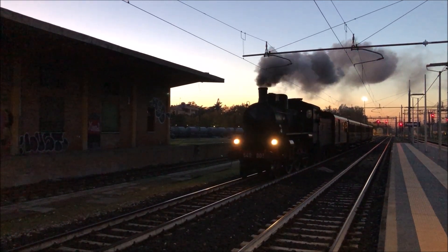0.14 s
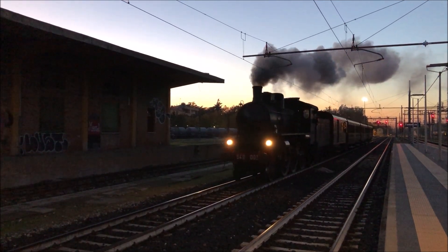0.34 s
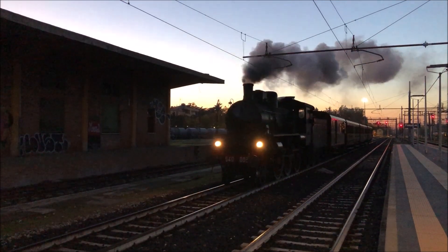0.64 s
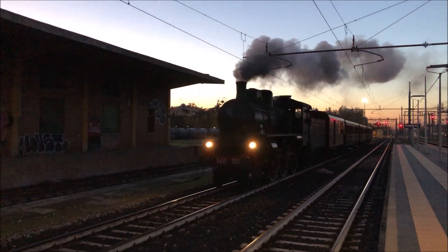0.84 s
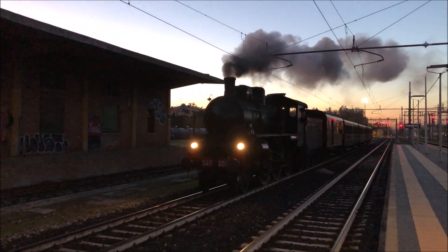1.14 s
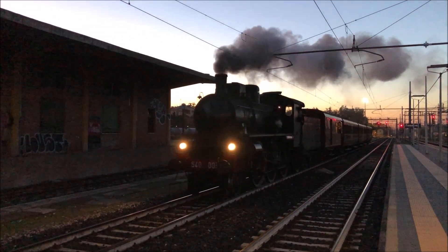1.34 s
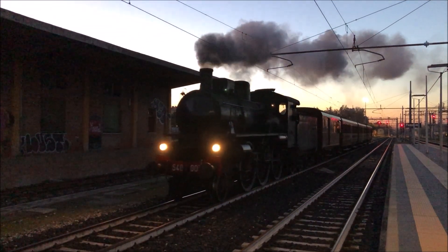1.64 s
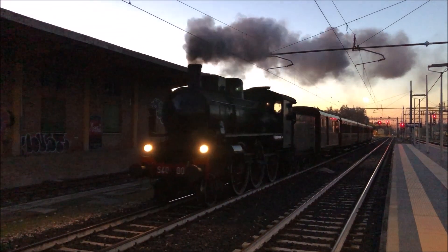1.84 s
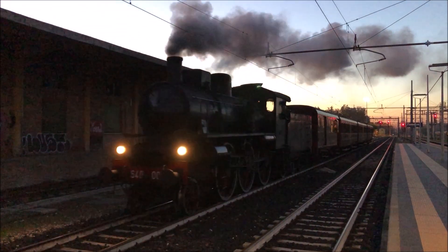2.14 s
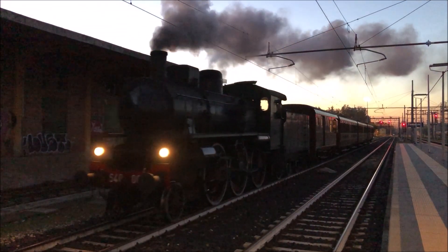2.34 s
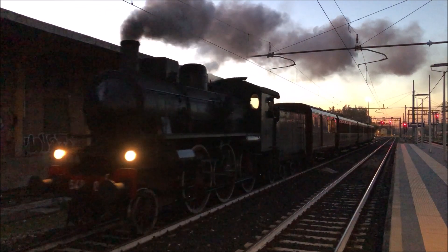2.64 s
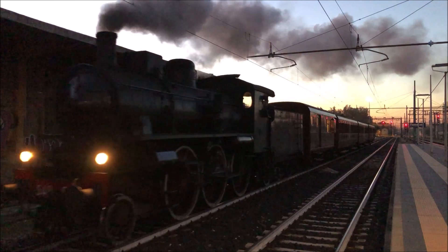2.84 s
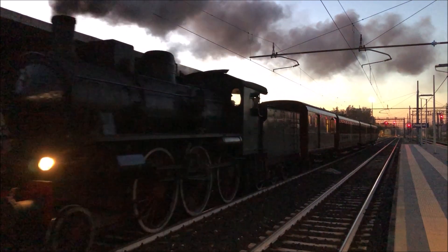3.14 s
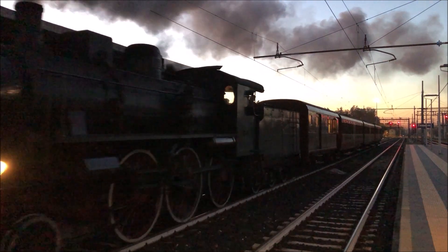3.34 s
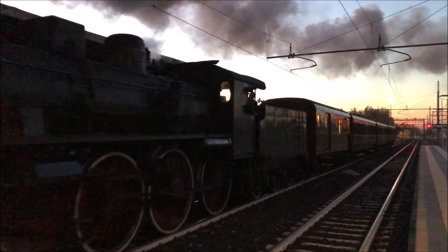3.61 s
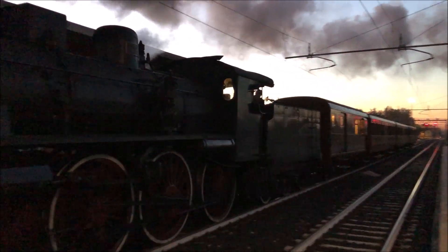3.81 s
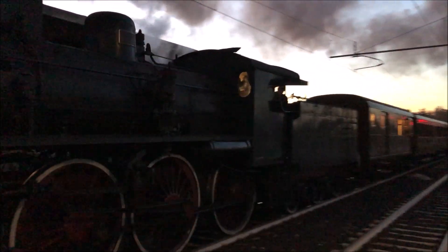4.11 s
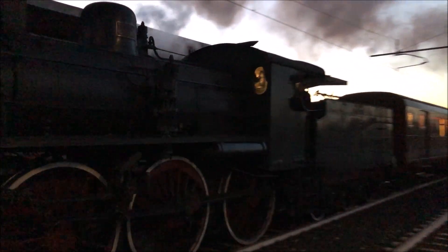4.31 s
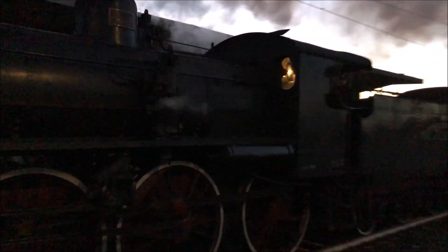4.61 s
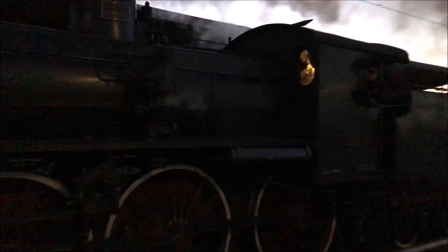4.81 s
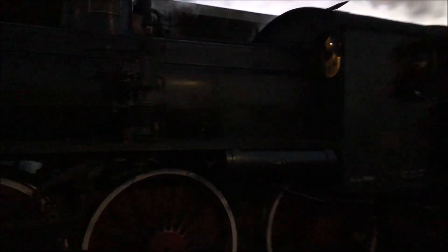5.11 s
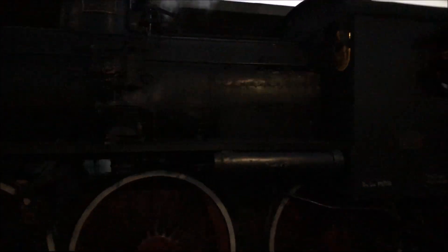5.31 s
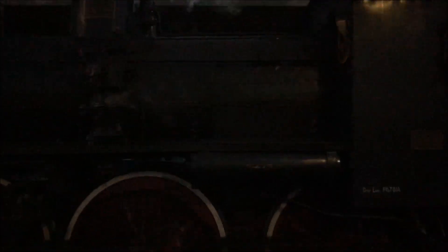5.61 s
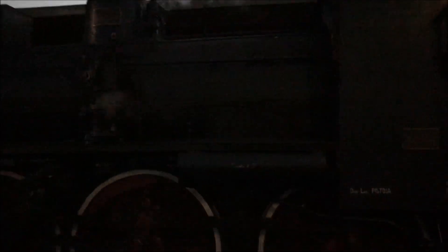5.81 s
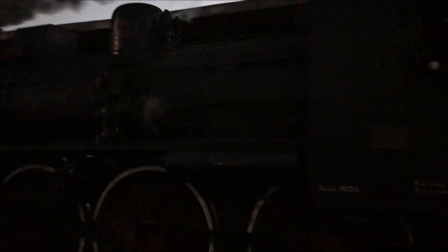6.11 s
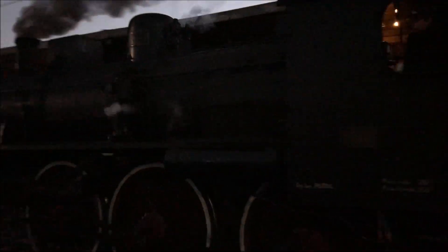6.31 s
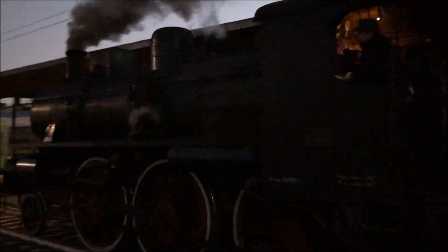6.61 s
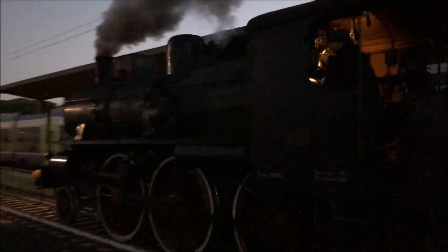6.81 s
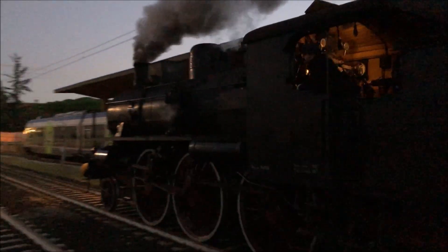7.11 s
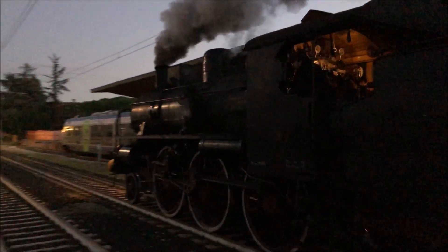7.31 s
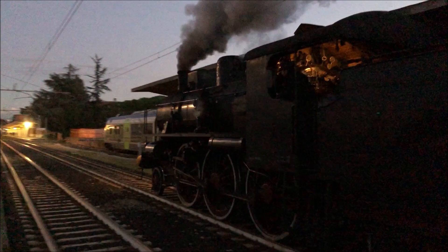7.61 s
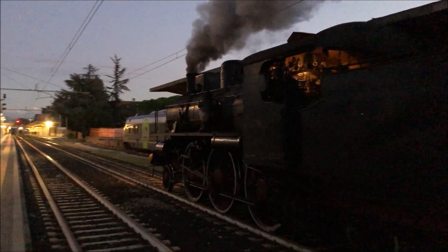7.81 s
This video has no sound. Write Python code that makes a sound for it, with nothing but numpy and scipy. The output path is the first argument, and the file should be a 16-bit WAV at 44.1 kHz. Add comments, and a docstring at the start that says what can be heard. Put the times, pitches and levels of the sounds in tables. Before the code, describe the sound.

A distant-to-close steam train heard from one fixed platform microphone, the same in both channels. Quiet rumble, leaking steam and metallic clinks come first, then a shrill, fluttering whistle: a long blast, a brief gap, a short one, with ringing station echoes. Afterwards rumble and hiss swell as the engine rolls by, puffing regularly, squeaking and finally thudding dully.

```python
"""Steam locomotive whistling into a station

A steam locomotive rolls in and draws close, blowing a long and a short blast on its whistle.
The whistle is a pipe tone with fluttering overtones and jet noise, beating against moving echoes.
Wheels rumble and roar as shaped noise; steam leaks as bright hiss and puffs, mostly a second apart.
Rods clink as decaying partials over scraping noise, running gear knocks dully, and steel sings thinly.
All sources reach one microphone on the platform; the sound above the bass dips for instants."""
import sys
import numpy as np
from scipy import signal
from scipy.fft import rfft, irfft, next_fast_len
from scipy.io import wavfile
from scipy.ndimage import uniform_filter1d, minimum_filter1d, map_coordinates

SR = 44100
rng = np.random.default_rng(int(sys.argv[2]) if len(sys.argv) > 2 else 0)


def log_audio(samples):
    """Write samples as a 16-bit WAV file to the path given in sys.argv[1]."""
    # one column per channel
    frames = np.atleast_2d(samples).T
    # limit to full scale, then quantise
    limited = np.clip(frames, -1, 1)
    pcm = np.round(limited * 32767).astype(np.int16)
    wavfile.write(sys.argv[1], SR, pcm)


N = 350595
T = np.arange(N) / SR  # time of each sample in seconds


def amp(db):
    """Decibels to gain."""
    return 10 ** (np.asarray(db) / 20)


def unit(x):
    """Scale to rms 1."""
    return x / np.sqrt(np.mean(x ** 2) + 1e-20)


def along(points, hz):
    """Interpolate (Hz, value) points on a log frequency axis."""
    f, v = np.transpose(points)
    return np.interp(np.log(hz + 1), np.log(f), v)


def curves(rows):
    """One value per sample for each column after the time."""
    s, *cols = np.transpose(rows)
    return [np.interp(T, s, c) for c in cols]


def wobble(rate):
    """A smooth random curve, rate knots a second."""
    knots = rng.standard_normal(int(N * rate / SR) + 4)
    return map_coordinates(knots, [T * rate])


def filtered(x, response):
    """Multiply the spectrum of x by a response of frequency."""
    m = next_fast_len(N + SR // 2)
    return irfft(rfft(x, m) * response(np.fft.rfftfreq(m, 1 / SR)), m)[:N]


def rush(spectrum, patchy_db):
    """Turbulent noise of rms 1, with patches of random gain in time and frequency."""
    z = signal.stft(rng.standard_normal(N), nperseg=512)[2]
    field = uniform_filter1d(rng.standard_normal(z.shape), size=5, axis=0)
    field = uniform_filter1d(field, size=12, axis=1)
    noise = signal.istft(z * amp(patchy_db * unit(field)), nperseg=512)[1][:N]
    return unit(filtered(noise, lambda hz: amp(along(spectrum, hz))))


def narrow(centre_hz, width_hz):
    """Noise of rms 1 in one resonance, down to half amplitude one width either side of its centre."""
    noise = rng.standard_normal(N)
    return unit(filtered(noise, lambda hz: 1 / (1 + ((hz - centre_hz) / width_hz) ** 2)))


# Rumble of the train, low around the whistle.
# Each row: time in seconds, ground level in dB, frame level in dB, both before a small trim.
RUMBLE_LEVELS = [(0, -32.5, -41), (.85, -34, -42), (1.05, -31.5, -36.7), (2.1, -30, -38.5),
                 (2.78, -29.5, -34.5), (3.0, -37, -40.5), (3.25, -34.5, -40), (3.85, -41, -46),
                 (4.5, -40, -39), (4.8, -35, -36), (5.35, -34.5, -34), (5.6, -34, -28.5), (6.5, -23, -26),
                 (6.85, -30, -26), (7.3, -27, -24.5), (7.94, -24.5, -24.5)]
# Wheels on the rails. Each row: time in seconds, relative level in dB.
# The faint singing of the steel follows it too.
ROLL_LEVELS = [(0, -39), (.35, -36.5), (2.6, -32.5), (3.25, -30), (3.85, -42.5), (4.35, -40), (5.3, -32.5),
               (6.4, -27), (6.75, -29), (7.94, -31.5)]
# Colours of the shaken ground, the frame and the roaring rails.
# Each row: frequency in Hz, relative density in dB per Hz.
GROUND_SPECTRUM = [(20, -40), (35, -26), (55, -5), (90, 1), (125, -4.5), (180, -14.5), (400, -58)]
FRAME_SPECTRUM = [(70, -21), (130, 2), (170, 0), (290, -1.5), (420, -11.5), (600, -13), (1000, -35.5)]
RAIL_SPECTRUM = [(250, -13), (350, -9.5), (450, -5.5), (550, -1), (800, 1.5), (1150, -4.5), (1420, -0.5),
                 (1650, -6.5), (1850, -4), (2300, -11), (3000, -10.5), (4000, -15.5), (7000, -26.5)]


def wheels():
    """The rolling train shakes the ground and its own frame, and makes the rails roar."""
    ground_db, frame_db = curves(RUMBLE_LEVELS)
    roll_db, = curves(ROLL_LEVELS)
    ground = amp(ground_db - 0.04) * rush(GROUND_SPECTRUM, patchy_db=-1.0)
    frame = amp(frame_db - 0.56) * rush(FRAME_SPECTRUM, patchy_db=2.0)
    rails = amp(roll_db + 0.83 + 0.31 * wobble(25)) * rush(RAIL_SPECTRUM, patchy_db=1.7)
    return ground + frame + rails


# Leaking steam. Each row: time in seconds, relative level in dB.
LEAK_LEVELS = [(0, -53), (1.15, -45.5), (2.7, -44), (2.95, -38.5), (4.3, -50.5), (4.9, -43.5),
               (5.35, -41.5), (5.8, -35.5), (6.8, -36.5), (7.5, -40), (7.94, -46)]
# Puffs, one for each turn of the driving wheels.
# Each row: start in seconds, level in dB, length in seconds, surge of the leak in dB.
STEAM_PUFFS = [(.39, -46, .17, 6), (1.34, -30.5, 0.27, 1), (2.378, -53, 0.41, 2), (4.51, -33, 0.22, 3.5),
               (5.486, -27, 0.22, 3.5), (6.39, -25, 0.26, 4.5), (7.369, -26.5, 0.24, 5.5)]
# Colours of the leak and of the puffs. Each row: frequency in Hz, relative density in dB per Hz.
LEAK_SPECTRUM = [(1200, -19), (2500, -4), (4000, -1), (6000, 4), (8500, 1.5), (10000, 2), (12500, 2.5),
                 (15000, 5.5), (16000, 2.5)]
PUFF_SPECTRUM = [(400, -9), (900, -3), (1600, -3.5), (2600, 0), (3500, -9.5), (6000, -15), (15000, -17)]
# Top treble surviving the air as the engine nears. Each row: time in seconds, share from 0 to 1.
TREBLE_SHARE = [(0, 0.44), (1.2, 0.44), (2.5, 0.92), (7.95, 0.97)]


def steam():
    """A leak brightens as the engine nears and surges with each duller puff, which opens fast and fades."""
    leak_db, = curves(LEAK_LEVELS)
    puff_flow = np.zeros(N)
    for start, db, length, surge_db in STEAM_PUFFS:
        age = np.maximum(T - start, 0)
        opening = (1 - np.exp(-age / 0.015)) * np.exp(-(age / length) ** 3)
        puff_flow = puff_flow + amp(db) * opening
        leak_db = leak_db + surge_db * opening
    hiss = rush(LEAK_SPECTRUM, patchy_db=2.35)
    dull = filtered(hiss, lambda hz: 1 / (1 + (hz / 8000) ** 4))
    treble = hiss - dull
    treble_share, = curves(TREBLE_SHARE)
    leak = amp(leak_db + 6.0 + 1.04 * wobble(30)) * (dull + treble_share * treble)
    return leak + puff_flow * rush(PUFF_SPECTRUM, patchy_db=3)


# Short squeals of steel on steel.
# Each row: centre in seconds, peak level in dB, half length in seconds, pitch in Hz.
SQUEAK_FLARES = [(.13, -43, .04, 7400), (1.118, -35, .03, 7140), (1.392, -31.5, 0.035, 7320),
                 (2.486, -37.5, 0.15, 7270), (2.693, -38, 0.073, 7340), (4.948, -37, .04, 6900),
                 (5.288, -32, 0.047, 7220), (6.584, -22.5, 0.016, 7250), (7.652, -37, 0.035, 7200),
                 (7.927, -36, 0.024, 7250)]
# A flange grinds on the rail: moment it is nearest, and how fast it falls to either side.
GRIND_S, GRIND_DB, GRIND_FADE_DB_PER_S = 6.06, -33, 21


def squeaks():
    """Rubbing steel sings faintly all along and flares up in short squeaks; a flange grinds as it passes."""
    roll_db, = curves(ROLL_LEVELS)
    singing = amp(roll_db - 18.0 + 4.7 * wobble(10)) * narrow(centre_hz=7190, width_hz=130)
    flares = np.zeros(N)
    for centre, db, half, hz in SQUEAK_FLARES:
        swell = amp(db) * np.exp(-((T - centre) / half) ** 2)
        # a fast random phase roughens the pitch
        flares = flares + swell * np.sin(2 * np.pi * hz * T + 1.4 * wobble(330))
    grind_db = GRIND_DB - GRIND_FADE_DB_PER_S * np.abs(T - GRIND_S)
    grind = amp(grind_db) * narrow(centre_hz=1824, width_hz=63)
    return singing + flares + grind


# Heavy knocks of the running gear. Each row: time in seconds, relative level in dB.
GEAR_KNOCKS = [(2.73, -30), (7.075, -17), (7.338, -15.5), (7.749, -15.5)]


def knocks():
    """Play in the rods thuds dully through the frame: decaying noise bursts in a low resonance."""
    blows = np.zeros(N)
    for start, db in GEAR_KNOCKS:
        blows = blows + amp(db - 60 * np.abs(T - start) / 0.28) * (T > start)
    bursts = blows * rng.standard_normal(N)
    return filtered(bursts, lambda hz: 14 / (1 + ((hz - 105) / 70) ** 2))


# Clinks of the rods. Each row: start in seconds, relative level in dB.
ROD_CLINKS = [(0.711, -32), (1.04, -22), (1.995, -26.5), (2.085, -32), (2.32, -20.5), (5.468, -18)]
# Partials of the ringing steel.
# Each row: frequency in Hz, relative level in dB, time to fall 60 dB in seconds.
ROD_PARTIALS = [(4260, -12.5, 0.069), (6700, -8, 0.29), (9760, -7, 0.054), (12200, -23, .06),
                (14750, -6, .1)]


def clinks():
    """Play in the rods makes bright clinks: decaying partials of ringing steel with a scrape of noise."""
    out = np.zeros(N + SR)
    t = np.arange(SR // 2) / SR
    for start, db in ROD_CLINKS:
        strengths, phases = rng.standard_normal((2, len(ROD_PARTIALS)))
        ring = np.zeros(len(t))
        for (hz, level, t60), strength, phase in zip(ROD_PARTIALS, strengths, phases):
            drift = 0.16 * np.cumsum(rng.standard_normal(len(t)))  # wandering phase blurs the partial
            decay = amp(level + 2 * strength - 60 * t / t60)
            ring = ring + decay * np.sin(2 * np.pi * hz * t + phase + drift)
        scrape = 0.73 * amp(-60 * t / 0.11) * rng.standard_normal(len(t))
        onset = 1 - np.exp(-t / 0.0022)
        out[round(start * SR):][:len(t)] += amp(db) * (ring + scrape) * onset
    return out[:N]


# Reverberation of the station. Each row: frequency in Hz, time to fall 60 dB in seconds.
STATION_DECAY = [(200, 1.5), (900, 2.7), (2800, 0.4), (6000, 1.4), (14000, 0.49)]


def station(x):
    """Diffuse answer of the station: a noise tail of unit energy in which each band dies at its own rate."""
    hz, t, z = signal.stft(rng.standard_normal(2 * SR), SR, nperseg=256)
    decay = amp(-60 * t / along(STATION_DECAY, hz)[:, None])
    tail = signal.istft(z * decay, SR, nperseg=256)[1]
    return signal.fftconvolve(x, tail / np.linalg.norm(tail))[:N]


# Walls that answer the whistle.
# Each row: delay at the first pull in seconds, its growth in seconds per second, level in dB.
ECHO_WALLS = [(.075, .005, -15), (.17, .002, -17.5), (.39, .002, -34), (.66, .002, -27.5),
              (1.02, .001, -36)]
ECHO_TOP_HZ, ECHO_DULLS_PER_S = 6040, 3.7  # the air takes more treble the longer an echo travels


def wall_echoes(tone, since):
    """The engine moves, so each echo has its own Doppler shift and beats with the direct sound."""
    echoes = np.zeros(N)
    for delay, growth, db in ECHO_WALLS:
        echo = map_coordinates(tone, [(T - delay - growth * since) * SR])
        top_hz = ECHO_TOP_HZ / (1 + ECHO_DULLS_PER_S * delay)
        echoes = echoes + amp(db) * filtered(echo, lambda hz: 1 / (1 + (hz / top_hz) ** 4))
    return echoes


def flutter(angle):
    """Turbulence shakes the size and phase of a line: random in-phase and quadrature parts."""
    return (1 + .3 * wobble(75)) * np.sin(angle) + .3 * wobble(75) * np.cos(angle)


# Balance of the whistle's overtones. Each row: multiple of the pitch, relative level in dB at the
# first pull, change as the engine nears in dB per second.
WHISTLE_OVERTONES = [(2, -4.5, -2.5), (3, 1.5, 1), (4, -3.5, -6), (5, -9.5, 3), (6, -12, 5),
                     (7, -15.5, 3.5), (8, -15, -5), (9, -33, 3), (10, -40, 0), (11, -24.5, 7.5)]
SIDEWAYS_DB = -5  # middle level of the side-wall path against the direct one


def overtones(direct, sideways, since):
    """Each overtone comes direct and by the side walls, and beats with itself."""
    total, power = np.zeros(N), np.zeros(N)
    for order, db, db_per_s in WHISTLE_OVERTONES:
        size = amp(db + db_per_s * since)
        straight = flutter(order * direct)
        side_gain = amp(SIDEWAYS_DB + 5.5 * wobble(6))
        line = straight + side_gain * flutter(order * sideways + 1.34 * wobble(6))
        total = total + size * line
        power = power + size ** 2
    return total / np.sqrt(power)


def pressure(opens, shuts, attack, release):
    """Steam pressure at the whistle during one pull, 0-1: it builds, holds and drains."""
    build = 1 - np.exp(-np.maximum(T - opens, 0) / attack)
    drain = np.exp(-(np.maximum(T - shuts, 0) / release) ** 2)
    return build * drain


# Pulls of the whistle valve. Each row: opens in seconds, starts to shut in seconds, attack in seconds,
# release in seconds, time for the overtones to bloom in seconds, full-pressure pitch in Hz,
# relative overtone level in dB, relative steam jet level in dB.
VALVE_PULLS = [(2.892, 3.681, 0.0462, .085, 0.037, 936.9, -13.5, -22),
               (3.856, 4.038, 0.0273, 0.056, 0.0046, 940, -14, -23.5)]
# The level of the fundamental from its onset to its fall, in the long and the short blast.
# Each row: time in seconds, relative level in dB.
LONG_FUNDAMENTAL = [(2.92, -14), (2.954, -8.5), (3.018, 3.5), (3.04, -12), (3.238, -14), (3.262, -17),
                    (3.308, -7.5), (3.362, -3), (3.424, -18.5), (3.46, -6), (3.768, -7), (3.8, -21)]
SHORT_FUNDAMENTAL = [(3.87, -22), (3.914, -12.5), (3.954, -18), (4.01, -10.5), (4.052, -6.5), (4.1, -17.5)]
# Colour of the steam jet. Each row: frequency in Hz, relative density in dB per Hz.
JET_SPECTRUM = [(200, -17), (550, -5), (1350, -2.5), (2300, -2), (4200, 1), (6500, 2), (9800, -0.5),
                (12500, -1.5), (15800, -1)]
SAG_HZ = 44.1  # the pipe is this flat with no pressure behind it
CHOKE_PRESSURE = .22  # the tone chokes off around this pressure (0-1)
OVERTONES_GROW, JET_GROWS = 1.16, 1.3  # powers of the pressure
BREATHY_DB, BREATHY_SLACK_DB = -19.5, 10  # pipe noise at full pressure, and its rise as pressure drops
STUTTER_AFTER_S, STUTTER_S, STUTTER_HZ, STUTTER_DEPTH = .061, .025, 37, .7
SIDEWAYS_FLAT_HZ = 6  # sound by the side walls has less Doppler shift


def whistle():
    """A steam jet drives one pipe: pressure sets pitch and brightness, turbulence shakes both."""
    drive = np.max([pressure(*row[:4]) for row in VALVE_PULLS], axis=0)
    rows = np.array(VALVE_PULLS)
    pull = np.maximum(np.searchsorted(rows[:, 0], T) - 1, 0)  # the latest pull at each sample
    opens, _, _, _, bloom, full_hz, bright_db, jet_db = rows[pull].T
    since = T - VALVE_PULLS[0][0]

    speaks = drive ** 3 / (drive ** 3 + CHOKE_PRESSURE ** 3)
    bloomed = 1 - np.exp(-np.abs(T - opens) / bloom)
    fundamental_db, = curves(np.vstack([LONG_FUNDAMENTAL, SHORT_FUNDAMENTAL]))
    fundamental = amp(fundamental_db) * speaks
    bright = amp(bright_db) * drive ** OVERTONES_GROW * speaks * bloomed
    jet = amp(jet_db) * drive ** JET_GROWS

    shake = 1 + .0006 * wobble(30) + .0025 * wobble(260)
    pitch = (full_hz - SAG_HZ * (1 - drive) ** 1.7) * shake
    direct = 2 * np.pi * np.cumsum(pitch) / SR
    sideways = direct - 2 * np.pi * SIDEWAYS_FLAT_HZ * T

    # the fundamental stutters a few times while the first blast catches
    late = since - STUTTER_AFTER_S
    stutter_depth = STUTTER_DEPTH * np.exp(-(late / STUTTER_S) ** 2)
    stutter = 1 + stutter_depth * np.cos(2 * np.pi * STUTTER_HZ * late)
    # the jet's noise also rings the pipe, a little under its pitch
    breath_gain = amp(BREATHY_DB + BREATHY_SLACK_DB * (1 - drive))
    breath = breath_gain * narrow(centre_hz=915, width_hz=28)
    # the fundamental spreads widely and is heard by the side walls
    pipe = stutter * np.sin(sideways) + breath

    tone = amp(3) * fundamental * pipe + bright * overtones(direct, sideways, since)
    hiss = jet * amp(1.0 * wobble(14)) * rush(JET_SPECTRUM, patchy_db=1.4)
    source = tone + hiss
    return source + wall_echoes(tone, since) + amp(-20.5) * station(source)


def scene():
    """All sources reach one microphone, heard alike in both channels."""
    mono = wheels() + steam() + squeaks() + knocks() + clinks() + whistle()
    return np.array([mono, mono])


def limiter(x, ceiling):
    """The gain backs off smoothly around peaks above the ceiling."""
    needed = np.minimum(1, ceiling / (np.abs(x).max(axis=0) + 1e-9))
    return x * uniform_filter1d(minimum_filter1d(needed, size=700), size=350)


# Brief dips in level above the bass. Each row: centre in seconds, depth in dB.
LEVEL_DIPS = [(.043, 8), (.32, 8), (.577, 9), (1.022, 10), (1.388, 11), (2.455, 10), (3.904, 11),
              (4.842, 12), (5.302, 28), (5.548, 10), (6.4, 8), (6.742, 11), (7.35, 30), (7.487, 10)]
DIP_HALF_S, DIP_WIDENS_S_PER_DB = .0045, .0003  # half length, and its growth with depth
TOP_HZ = 15850  # band limit


def record(dry):
    """The sound dips for instants above the bass, peaks are limited, and the band limit cuts the top."""
    dip_db = np.zeros(N)
    for centre, depth in LEVEL_DIPS:
        half = DIP_HALF_S + DIP_WIDENS_S_PER_DB * depth
        dip_db = dip_db - depth * np.exp(-((T - centre) / half) ** 4)
    bass = np.array([filtered(x, lambda hz: 1 / (1 + (hz / 700) ** 4)) for x in dry])
    held = limiter(bass + amp(dip_db) * (dry - bass), ceiling=.92)
    return np.array([filtered(x, lambda hz: hz < TOP_HZ) for x in held])


dry = scene()
out = record(dry)
log_audio(out)
```